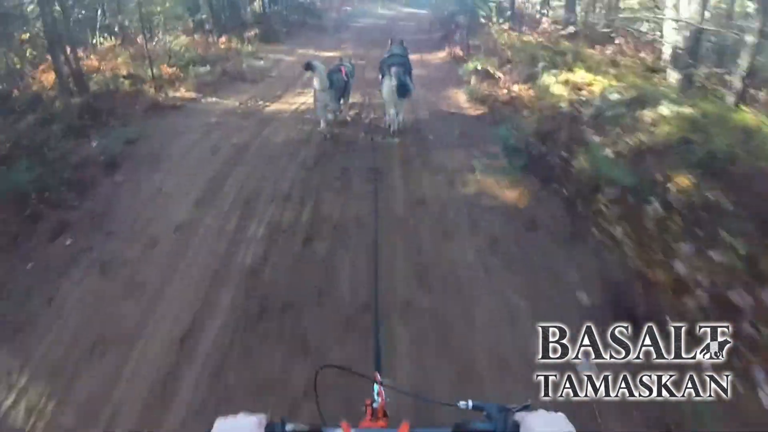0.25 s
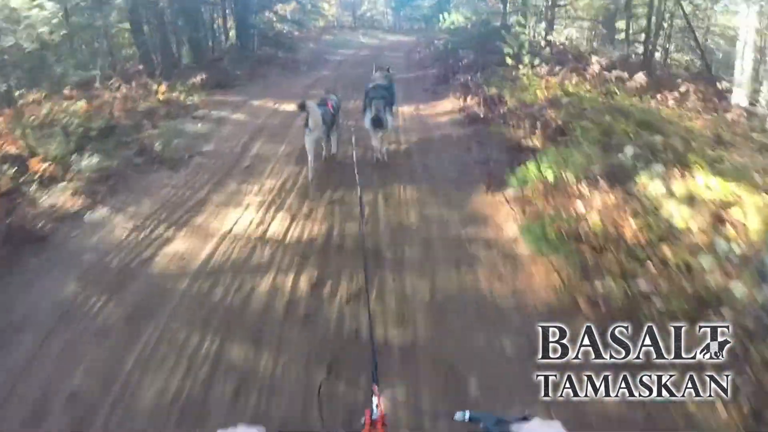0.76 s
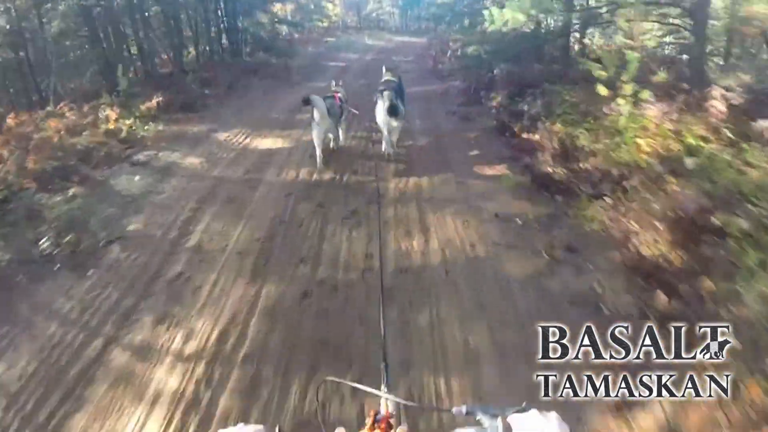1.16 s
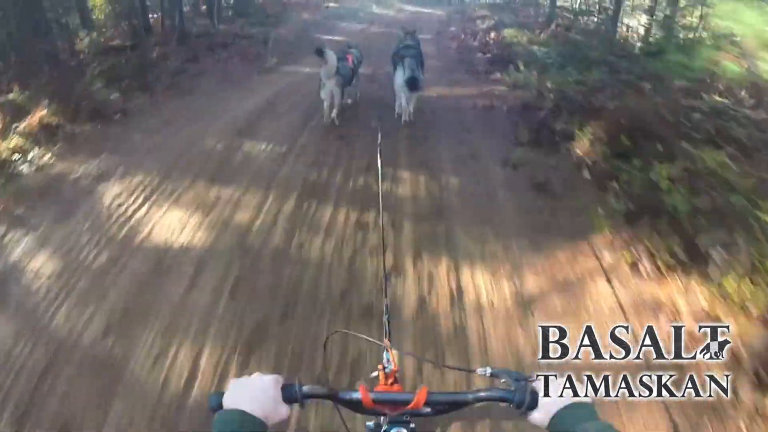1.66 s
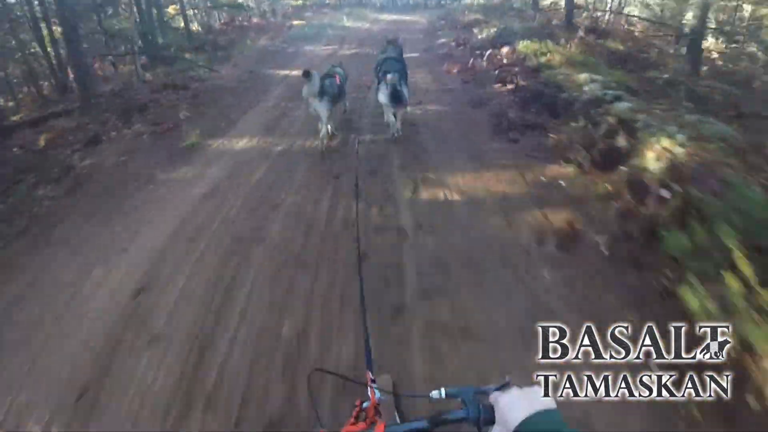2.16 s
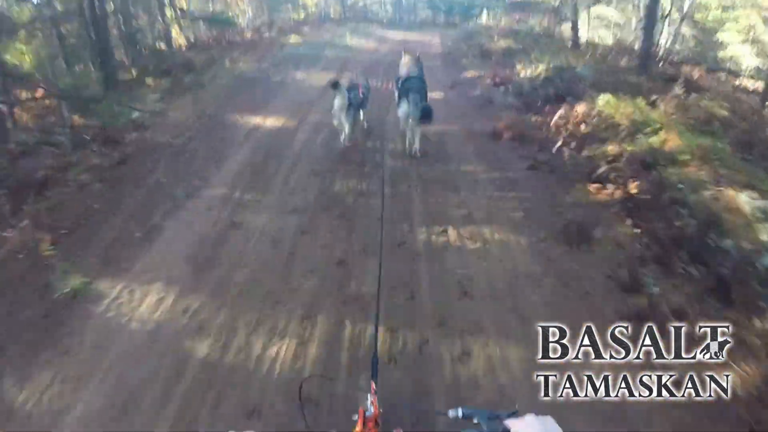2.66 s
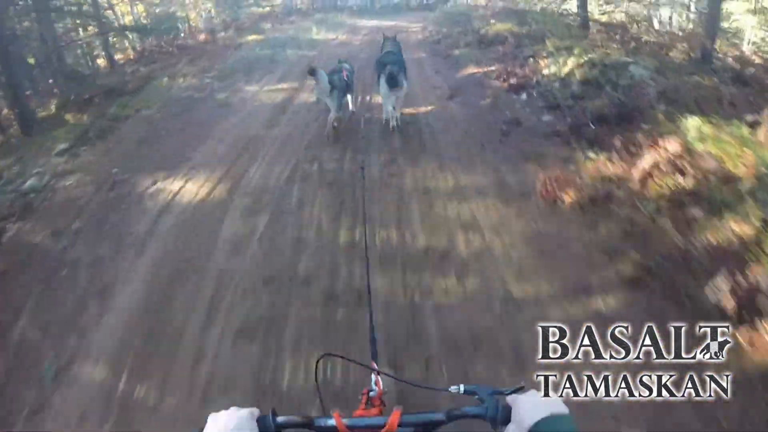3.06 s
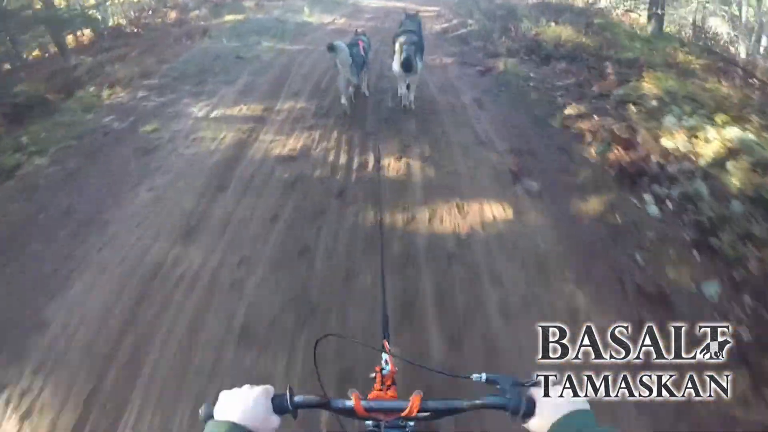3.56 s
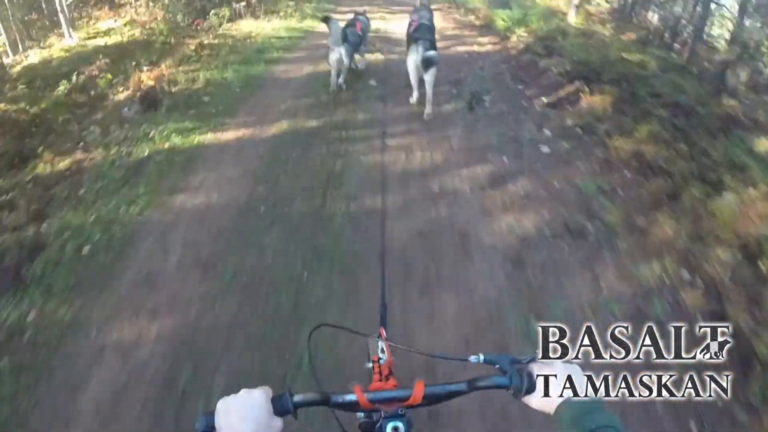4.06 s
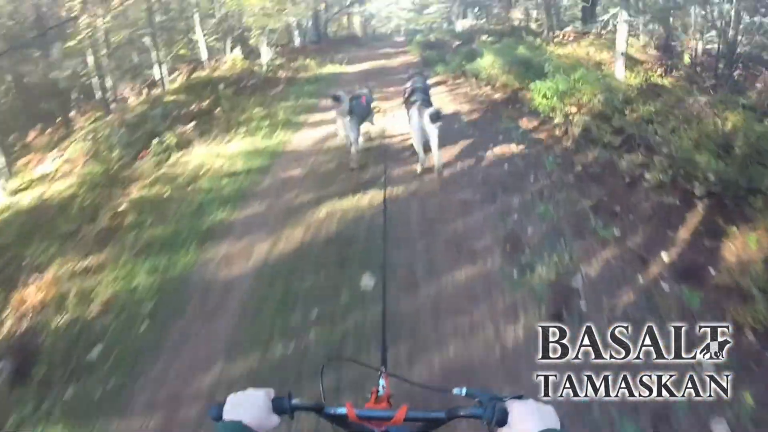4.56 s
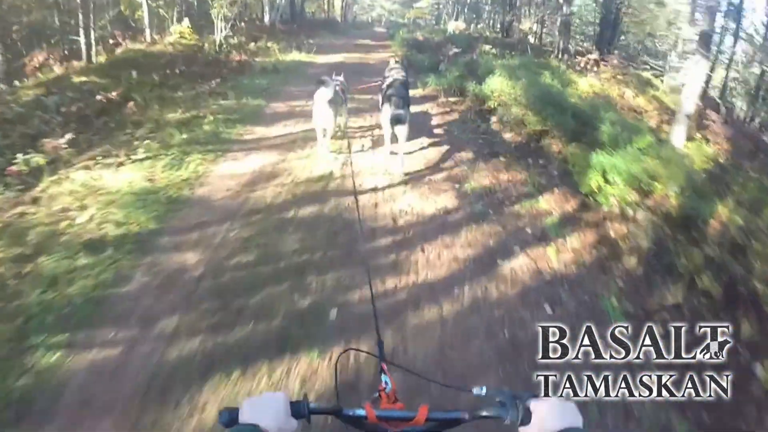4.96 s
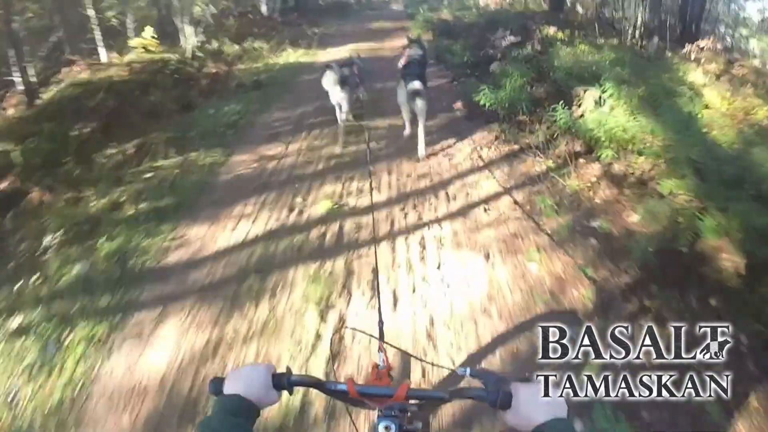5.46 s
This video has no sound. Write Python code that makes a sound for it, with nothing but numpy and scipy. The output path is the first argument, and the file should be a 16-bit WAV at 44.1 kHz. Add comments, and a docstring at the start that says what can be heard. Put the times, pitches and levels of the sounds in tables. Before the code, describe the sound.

A mountain bike rolls over a rutted dirt trail, loose metal clinking while wind and bumps rumble on the microphone.

```python
"""A mountain bike towed by two unheard dogs on a rutted dirt trail; the microphone rides on the rider.
From the start the tyres hiss and crunch just below, and the airstream buffets the microphone.
Loose metal (chain, tow-line hook) clinks at once, and from 0.14 s ruts jolt the camera mount into
low thuds. The ride is roughest around 1.5 s, with more metal ticking and more wind. After 2.2 s the
clinks thin out; one dry click comes at 3.7 s, and the bike rolls on."""
import sys
import numpy as np
from scipy import signal
from scipy.fft import rfft, irfft
from scipy.io import wavfile

SR = 44100
rng = np.random.default_rng(int(sys.argv[2]) if len(sys.argv) > 2 else 0)


def master_out(mix):
    """Clip the mix to full scale and print it as 16-bit PCM to the path in sys.argv[1]."""
    frames = np.transpose(np.atleast_2d(mix))
    ceiling = np.clip(frames, -1, 1)
    pcm = np.round(ceiling * 32767).astype(np.int16)
    wavfile.write(sys.argv[1], SR, pcm)


N = 251811

# Tyres rolling on dirt. Each row: time in seconds, level in dB before the lift given in tyres().
ROLL_LEVELS = [(0.03, -63), (0.26, -65.5), (1.1, -66), (1.42, -63.5), (1.82, -65.5), (2.15, -65),
               (4.28, -66.5), (4.81, -65), (5.66, -66.5)]
# Rumble of the tyres. Each row: frequency in Hz, relative spectral density in dB.
ROLL_SPECTRUM = [(70, -2.5), (120, 2.5), (190, 1), (290, -7), (500, -10.5), (900, -15), (1500, -23),
                 (3000, -39)]
# Sand sprayed by the tread. Each row: frequency in Hz, relative spectral density in dB.
SAND_SPECTRUM = [(700, -9), (1600, 3), (2500, 2), (3500, -1), (5000, -4), (7000, -9), (10000, -18),
                 (12000, -15.5), (15000, -56)]
# Hollow ring of grit in tyre and wheel. Each row: frequency in Hz, width in Hz, relative gain in dB.
HOLLOW_MODES = [(1160, 150, 9.5), (1547, 160, 6)]
# The higher, gritty ring. Each row: frequency in Hz, width in Hz, relative gain in dB.
GRITTY_MODES = [(2035, 193, 3.5), (2195, 92, 4), (2370, 200, -6)]
# Patches of loose gravel. Each row: start in seconds, hollow crunch in dB, gritty crunch in dB.
GRAVEL_PATCHES = [(0.199, -71, -62), (0.593, -76, -71), (1.503, -71, -63), (2.196, -70, -79),
                  (2.391, -67, -68), (2.592, -66, -68), (3.02, -88, -65), (3.12, -82, -64.5),
                  (3.294, -73, -78), (3.522, -90, -70), (3.985, -90, -63), (4.14, -71, -78),
                  (4.703, -89, -69), (4.766, -78, -73), (4.841, -75, -68), (5.418, -85, -65),
                  (5.645, -79, -82)]
# Eddies on the microphone. Each row: frequency in Hz, relative spectral density in dB.
WIND_SPECTRUM = [(6, -14.5), (11, 1), (18, 3.5), (30, -10), (45, -34), (70, -29.5), (110, -51), (200, -55)]
# Loose metal clashing. Each row: start in seconds, rms level in dB, bright sheen in dB relative to
# the body of the clash, length of the chatter in seconds.
CLASHES = [(0.009, -48, 3.5, .006), (0.036, -55, -2, 0.011), (0.093, -50.5, -2, 0.016),
           (0.188, -58.5, 0, 0.0086), (0.274, -65, -6, 0.0068), (0.404, -49.5, -4, 0.0048),
           (0.428, -56.5, 3, 0.0059), (0.539, -51.5, -2, 0.011), (0.598, -52.5, -7, 0.0074),
           (0.608, -52, -6, 0.0088), (0.648, -55.5, -5, 0.01), (0.671, -53, -4, 0.014),
           (0.752, -57, 1, 0.0067), (0.803, -62, -11, 0.005), (0.819, -60.5, 3, 0.0079),
           (1.031, -57.5, -2, .007), (1.106, -52.5, -8, .02), (1.179, -58.5, -2, 0.0074),
           (1.209, -63, -9, 0.031), (1.29, -54, -2, 0.0067), (1.378, -50, 2.5, 0.011),
           (1.418, -45, 5.5, 0.0094), (1.475, -49, 0, 0.012), (1.545, -59, -9, 0.016),
           (1.569, -47, -0.5, 0.0097), (1.594, -45.5, -7, 0.004), (1.616, -50.5, 0, 0.011),
           (1.655, -53.5, -5, 0.013), (1.723, -47, -7.5, 0.0061), (1.761, -55, -4, 0.012),
           (1.771, -42.5, -9, 0.005), (1.789, -49, -7, 0.0074), (1.824, -53, -4, .011),
           (1.88, -43.5, 0, 0.0076), (1.899, -49.5, -4, 0.0064), (1.95, -54.5, -12, 0.0089),
           (1.988, -47, -2, 0.013), (2.056, -53, -1, 0.016), (2.089, -50, 1, 0.0068),
           (2.139, -58.5, -20, 0.0034), (2.165, -63, -10, .007), (2.437, -61, 7, 0.0075),
           (2.45, -50, -3.5, 0.0062), (2.829, -48, -0.5, 0.0066), (2.862, -57.5, -10, 0.0041),
           (3.071, -53.5, 3, 0.0076), (3.108, -59, -14, 0.0068), (3.327, -50.5, -3.5, 0.0091),
           (3.393, -48.5, 1, 0.0087), (3.614, -52.5, -3.5, 0.019), (3.697, -52, -2, 0.0044),
           (3.921, -53, -3, 0.0072), (4.007, -52.5, -7, 0.01), (4.082, -57, -6, 0.008),
           (4.148, -55, -4.5, 0.0065), (4.311, -52, -1.5, 0.0062), (4.342, -52, -4, .007),
           (4.701, -50.5, -1, 0.0085), (4.885, -51, -2, 0.0084), (4.916, -63, -22, 0.011),
           (4.954, -57.5, -6, 0.0094), (5.121, -48.5, -2, 0.0056), (5.187, -57, -2, 0.0075),
           (5.26, -53.5, 0, 0.01), (5.481, -52, -6, 0.0069), (5.53, -60, -4, 0.0069),
           (5.554, -52, -2, 0.0073)]
# Ring of chain and hook. Each row: frequency in Hz, relative level in dB, 60 dB decay time in seconds.
METAL_MODES = [(2025, -9, .035), (2490, -10, .03), (3117, -18, .22), (3580, -13, .04), (3918, -12, .045),
               (4250, -3, .015), (4518, 2, .032), (4800, -8, .015), (5500, -3, .016), (5787, -3, .03),
               (6050, 1, .015), (6330, -1, .015), (6590, -6, .075), (6760, 1, .022), (7025, -7, .045),
               (7532, -8, .035), (8145, -15, .035), (8510, -9, .04), (9130, -1, .018), (9505, 3, .03),
               (9740, 0, .02), (10108, -1, .03), (10900, -17, .025), (11770, -16, .02), (12400, -9, .022),
               (13292, -10, .03), (13890, -10, .025), (15100, -16, .022)]
# Crack of a metal contact. Each row: frequency in Hz, relative spectral density in dB.
CRACK_SPECTRUM = [(800, -27), (1450, -5.5), (2200, 4), (3400, -4), (4400, 14), (5200, 4.5), (6600, 10),
                  (7700, -11), (9600, 18), (11000, -3), (14000, 4.5), (16000, -24)]
# Ruts in the trail. Each row: time in seconds, strength of the jolt in dB.
RUTS = [(0.137, -16), (0.25, -20.5), (0.453, -31.5), (0.588, -29.5), (0.626, -27), (0.722, -34),
        (1.211, -27.5), (1.34, -17), (1.423, -25), (1.531, -19.5), (1.635, -22.5), (1.695, -18),
        (1.879, -23.5), (1.997, -25.5), (2.052, -22), (2.116, -26), (2.22, -27.5), (2.28, -37.5),
        (2.4, -24.5), (2.456, -27.5), (2.619, -34.5), (2.87, -26), (3.062, -32), (3.242, -31.5),
        (3.313, -23), (3.38, -34.5), (3.57, -24.5), (3.739, -28), (4.13, -27.5), (4.238, -29),
        (4.334, -33.5), (4.51, -30.5), (4.564, -28.5), (4.756, -31), (5.079, -32.5), (5.439, -29.5),
        (5.512, -29), (5.664, -30)]
# Ring of the camera mount. Each row: frequency in Hz, relative level in dB, 60 dB decay time in seconds.
MOUNT_MODES = [(50.97, 1.5, 0.23), (32.65, -7.5, 0.38)]

SAND_DB, SAND_FOLLOWS = -70.5, 0.091   # level at average shaking, dB per dB of shaking
SOFT_SAND_S, SOFT_SAND_HALF_S, SOFT_SAND_DB = 2.46, 0.11, 2.5   # soft ground: middle, half span, boost
CRUNCH_DB, CRUNCH_FOLLOWS, CRUNCH_LEAD_S = -74, 0.98, 0.019   # at an average rut, dB per dB of jolt, lead
WIND_DB, WIND_FOLLOWS = -38.5, 0.26   # level at average shaking, dB per dB of shaking
CLACK_DB, MID_CLASH_DB, CLACK_GROWTH = -61, -53.0, 0.88   # low clack, at this clash level, dB per dB
RIPPLE_GAP_S, RIPPLE_DB = 0.11, -39.5   # unevenness between the ruts: mean spacing, mean jolt


def from_db(db):
    """Decibels to gain."""
    return 10 ** (np.asarray(db) / 20)


def rms_one(x):
    """Scale to rms 1."""
    return x / np.sqrt(np.mean(x ** 2) + 1e-20)


def add(out, s, sound):
    """Mix a sound in from s seconds on."""
    at = int(np.clip(round(s * SR), 0, N - 1))
    out[at:at + len(sound)] += sound[:N - at]


def coloured_noise(spectrum):
    """Steady noise of rms 1 with the given spectrum, rolled off beyond both ends."""
    hz, level_db = np.transpose(spectrum)
    f = np.maximum(np.arange(N // 2 + 1) * SR / N, 1)
    skirts = 1 / np.sqrt((1 + (hz[0] / (2 * f)) ** 4) * (1 + (f / (2 * hz[-1])) ** 4))
    gain = from_db(np.interp(np.log(f), np.log(hz), level_db)) * skirts
    return rms_one(irfft(rfft(rng.standard_normal(N)) * gain, N))


def drift(per_s):
    """A random curve that glides to a new value per_s times a second."""
    knots = rng.standard_normal(4096)
    return np.interp(np.arange(N) / SR * per_s, np.arange(len(knots)), knots)


def grains(per_s, spread_db):
    """Tiny impacts of many sizes at random moments."""
    sizes = from_db(spread_db * np.minimum(rng.exponential(1, N), 4)) * rng.choice([-1, 1], N)
    return sizes * (rng.random(N) < per_s / SR)


def resonate(x, modes):
    """Ring x through parallel resonances of alternating sign."""
    out = np.zeros(N)
    for k, (hz, width_hz, level_db) in enumerate(modes):
        r = np.exp(-np.pi * width_hz / SR)
        poles = [1, -2 * r * np.cos(2 * np.pi * hz / SR), r * r]
        gain = (-1) ** k * from_db(level_db) * (1 - r * r) / 2
        out += gain * signal.lfilter([1, 0, -1], poles, x + 1e-18)
    return out


def shaking(window_s=0.59):
    """Roughness of the ride in dB about its mean: the energy of nearby ruts on top of the ripples."""
    energy = np.full(N, from_db(RIPPLE_DB) ** 2 / RIPPLE_GAP_S)
    for s, jolt_db in RUTS:
        add(energy, s, [from_db(jolt_db) ** 2 * SR])
    window = np.hanning(int(window_s * SR))
    shake_db = 10 * np.log10(signal.fftconvolve(energy, window / window.sum(), "same"))
    return shake_db - shake_db.mean()


def tyres(shake_db, lift_db=1.5):
    """Below the microphone the tyres rumble and spray sand, more of it on rough or soft ground."""
    t = np.arange(N) / SR
    soft_db = SOFT_SAND_DB * np.exp(-((t - SOFT_SAND_S) / SOFT_SAND_HALF_S) ** 2)
    roll_db = np.interp(t, *np.transpose(ROLL_LEVELS)) + lift_db + 1.1 * drift(per_s=40)
    sand_db = SAND_DB + SAND_FOLLOWS * shake_db + soft_db + 1.4 * drift(per_s=70)
    roll = from_db(roll_db) * coloured_noise(ROLL_SPECTRUM)
    sand = from_db(sand_db) * coloured_noise(SAND_SPECTRUM)
    return roll + sand


def gravel(swell_s=0.0089, hollow_bed_db=-78.0, gritty_bed_db=-76.0, sand_db=-4.5, thump_db=1.0):
    """Grit crushed under the tread rings tyre and wheel, swelling at each rut and loose patch."""
    age = np.arange(5000) / SR / swell_s
    swell = age * np.exp(1 - age)
    hollow, gritty = np.zeros(N), np.zeros(N)
    mean_jolt_db = np.mean(RUTS, axis=0)[1]
    for s, jolt_db in RUTS:
        crunch_db = CRUNCH_DB + CRUNCH_FOLLOWS * (jolt_db - mean_jolt_db)
        add(hollow, s - CRUNCH_LEAD_S, from_db(crunch_db) * swell)
    for s, hollow_db, gritty_db in GRAVEL_PATCHES:
        add(hollow, s, from_db(hollow_db) * swell)
        add(gritty, s, from_db(gritty_db) * swell)
    crunch = np.zeros(N)
    for bed_db, swells, modes in [(hollow_bed_db, hollow, HOLLOW_MODES),
                                  (gritty_bed_db, gritty, GRITTY_MODES)]:
        grit = grains(per_s=3000, spread_db=3.0)
        crunch += (from_db(bed_db) + swells) * rms_one(resonate(grit, modes))
    # a hollow crunch also thumps the tyre and throws up sand
    thump = from_db(thump_db) * coloured_noise(ROLL_SPECTRUM)
    sand = from_db(sand_db) * coloured_noise(SAND_SPECTRUM)
    return crunch + hollow * (thump + sand)


def wind(shake_db):
    """Slow eddies press right on the microphone, harder as the rider is shaken."""
    return from_db(WIND_DB + WIND_FOLLOWS * shake_db) * coloured_noise(WIND_SPECTRUM)


def metal_shiver(clashes, shake_db, settle_s=0.023, lead_s=0.007, tremble_db=-8.0, stray_db=-52.0):
    """The metal trembles with tiny touches around a clash and ticks in between, more on rough ground."""
    energy = np.zeros(N)
    for s, clash_db, _, length_s in clashes:
        add(energy, s - lead_s, np.full(int(length_s * SR), from_db(clash_db) ** 2))
    r = np.exp(-1 / (settle_s * SR))
    agitation = np.sqrt(signal.lfilter([1 - r], [1, -r], energy + 1e-18))
    trembling = from_db(tremble_db) * agitation * rms_one(grains(per_s=400, spread_db=4.0))
    strays = from_db(stray_db) * grains(per_s=12 * from_db(1.9 * shake_db), spread_db=4.0)
    # light touches are soft and leave the highest modes alone
    touches = signal.sosfilt(signal.butter(6, 11000, fs=SR, output="sos"), trembling + strays)
    modes = [(hz, np.log(1000) / np.pi / t60, db + 20 * np.log10(t60)) for hz, db, t60 in METAL_MODES]
    return touches.std() * rms_one(resonate(touches, modes))


def chatter(length_s, contacts_per_s=1500, first_blow=2.3, fade_db=4.0, bite_s=.002):
    """Metal parts bite, then touch ever more weakly at random moments."""
    t = np.arange(2048) / SR
    touches = (rng.random(len(t)) < contacts_per_s / SR) * rng.standard_normal(len(t))
    touches[int(bite_s * SR)] = first_blow
    return touches * np.minimum(t / bite_s, 1) * from_db(-fade_db * (t / length_s) ** 2)


def loose_metal(clashes, crack_db=6.5, crack_t60=0.031, scatter_db=2.5, detune=0.0038):
    """Chain and hook clash close by: each chatter of contacts cracks and rings with its own mode mix."""
    count = 11025
    t = np.arange(count) / SR
    hz, mode_db, t60 = np.transpose(METAL_MODES)
    fading = from_db(-60 * t / t60[:, None])
    crack_noise = coloured_noise(CRACK_SPECTRUM)
    # clack, body and sheen of a clash
    filters = [signal.butter(4, edge_hz, kind, fs=SR, output="sos")
               for edge_hz, kind in [(2800, "low"), ([2800, 7900], "band"), (7900, "high")]]
    out = np.zeros(N)
    for s, clash_db, sheen_db, length_s in clashes:
        strengths = from_db(mode_db + scatter_db * rng.standard_normal(len(hz)))
        strengths *= rng.choice([-1, 1], len(hz))
        # the grip of the touching parts pulls the well-damped modes slightly out of tune
        pitch = hz * (1 + detune * rng.standard_normal(len(hz)) * np.median(t60) / t60)
        rings = strengths @ (np.sin(2 * np.pi * pitch[:, None] * t) * fading)
        start = rng.integers(N - count)
        crack = crack_noise[start:start + count] * from_db(crack_db - 60 * t / crack_t60)
        contacts = signal.fftconvolve(rings + crack, chatter(length_s))[:count]
        # the clack grows more slowly than the rest as the clash gets harder
        clack_db = CLACK_DB + CLACK_GROWTH * (clash_db - MID_CLASH_DB) - clash_db
        blow = slice(int(length_s * SR))
        clash = np.zeros(count)
        for band_db, sos in zip([clack_db, 0, sheen_db], filters):
            band = signal.sosfilt(sos, contacts)
            clash += from_db(band_db) * band / band[blow].std()
        add(out, s - .0005, from_db(clash_db) * clash / clash[blow].std())
    return out


def rebounds(gap_s=.02, loss_db=10.5, dulling_db=9, gap_spread=0.17, spread_db=1.5):
    """After each clash the parts fall back and touch again, weaker and duller. Rows as in CLASHES."""
    rows = []
    for s, clash_db, sheen_db, length_s in CLASHES:
        late, hard = rng.standard_normal(2)
        start_s = s + gap_s * (1 + gap_spread * late)
        rows.append((start_s, clash_db - loss_db + spread_db * hard, sheen_db - dulling_db, length_s))
    return rows


def ripples(shake_db, spread_db=2.5, follows=.6):
    """Small bumps, stronger on rough ground. Each row: time in seconds, strength of the jolt in dB."""
    gaps, hardness = rng.random((128, 2)).T
    times = np.cumsum(RIPPLE_GAP_S * (.5 + gaps))
    return [(s, RIPPLE_DB + follows * shake_db[int(s * SR)] + spread_db * (2 * hard - 1))
            for s, hard in zip(times, hardness) if s * SR < N]


def jolts(bumps, push_s=0.014, sway_hz=16.2, sway_db=-6.5, sway_t60=0.24, sway_lead_s=0.0182):
    """A bump first sways the rider, then the mount takes the blow and thuds right at the microphone."""
    t = np.arange(16000) / SR
    sway = np.sin(2 * np.pi * sway_hz * t) * from_db(sway_db - 60 * t / sway_t60)
    out = np.zeros(N)
    for s, jolt_db in bumps:
        tuning = 1 + .06 * rng.standard_normal()
        thud = sum(np.sin(2 * np.pi * hz * tuning * t) * from_db(db - 60 * t / t60)
                   for hz, db, t60 in MOUNT_MODES)
        add(out, s - push_s / 2, from_db(jolt_db) * thud)
        add(out, s - push_s / 2 - sway_lead_s, from_db(jolt_db) * sway)
    # the rider's body softens each blow
    push = np.sin(np.pi * np.minimum(t / push_s, 1)) ** 2
    return signal.fftconvolve(out, push / push.sum())[:N]


def dry_click(start_s=3.7075, peak_db=-30.5, relax_s=0.0056):
    """A single dry click: a sudden step that relaxes."""
    out = np.zeros(N)
    add(out, start_s, -from_db(peak_db) * np.exp(-np.arange(N) / SR / relax_s))
    return out


def scene():
    """One microphone in the open air; everything is close, without echoes."""
    shake_db = shaking()
    clashes = list(CLASHES) + rebounds()
    metal = loose_metal(clashes) + metal_shiver(clashes, shake_db)
    ground = jolts(list(RUTS) + ripples(shake_db)) + tyres(shake_db) + gravel()
    return (metal + ground + wind(shake_db) + dry_click())[None, :]


def record(dry):
    """The microphone passes no steady pressure, and the top is cut steeply."""
    low_cut_hz, high_cut_hz = 4, 15450
    coupled = signal.sosfilt(signal.butter(1, low_cut_hz, "high", fs=SR, output="sos"), dry)
    return signal.sosfilt(signal.ellip(10, .1, 80, high_cut_hz, fs=SR, output="sos"), coupled)


dry = scene()
out = record(dry)
master_out(out)
```